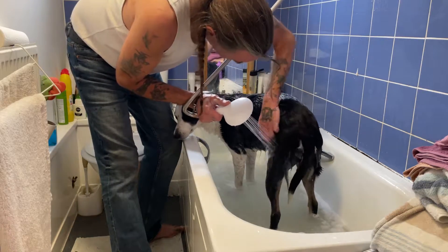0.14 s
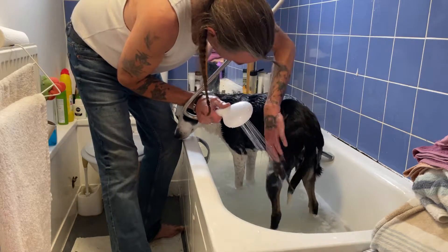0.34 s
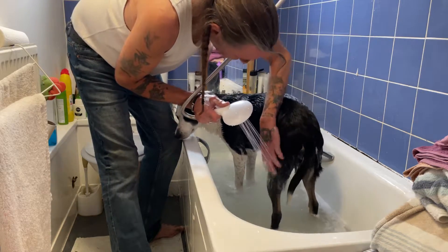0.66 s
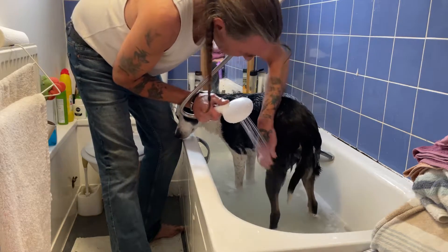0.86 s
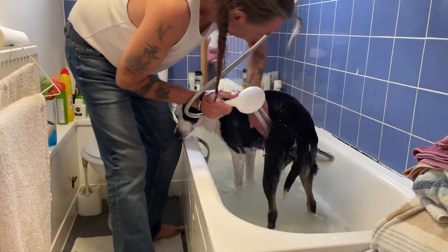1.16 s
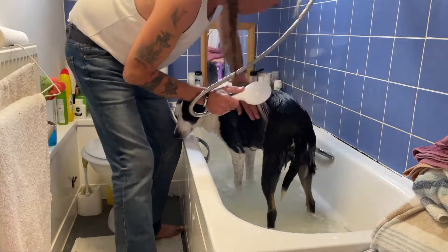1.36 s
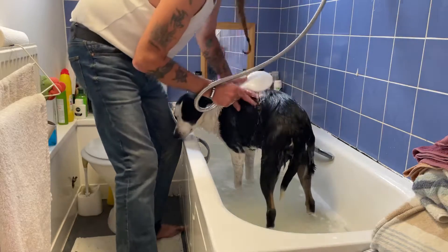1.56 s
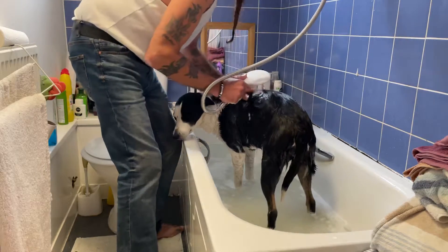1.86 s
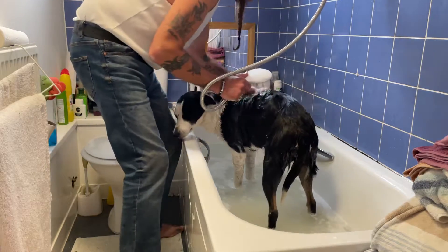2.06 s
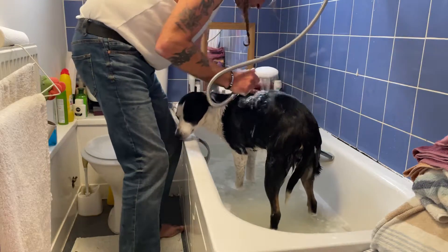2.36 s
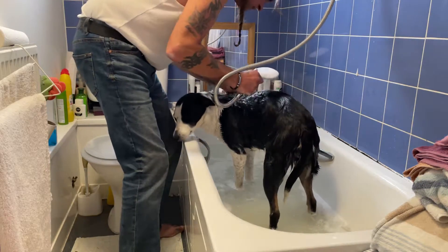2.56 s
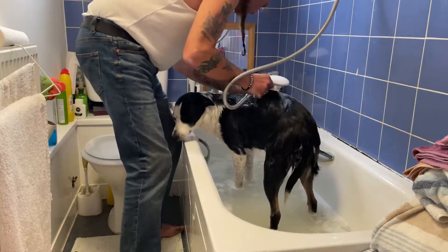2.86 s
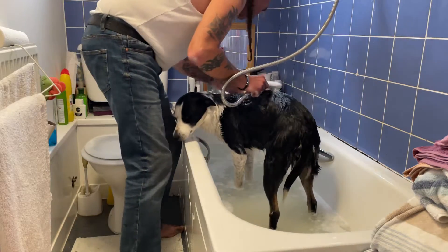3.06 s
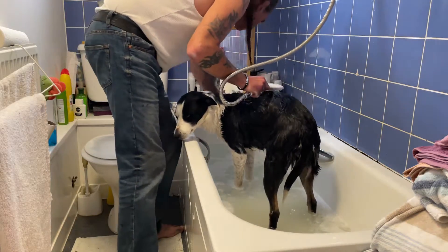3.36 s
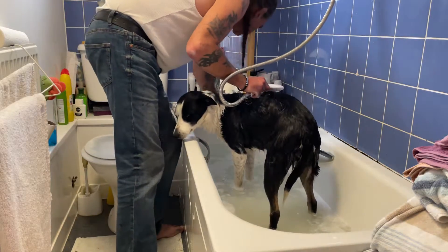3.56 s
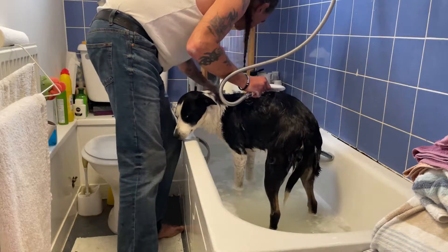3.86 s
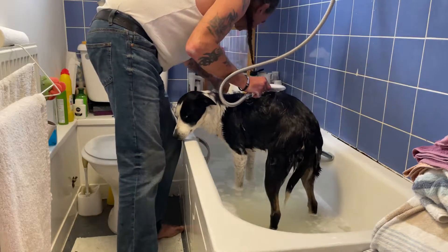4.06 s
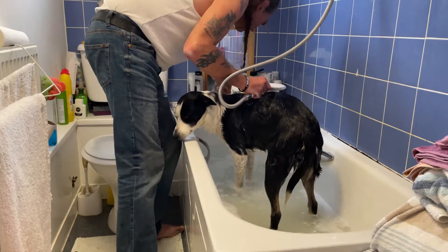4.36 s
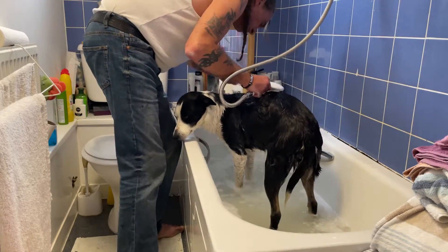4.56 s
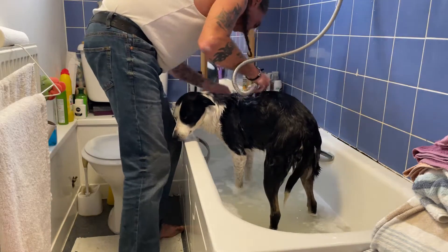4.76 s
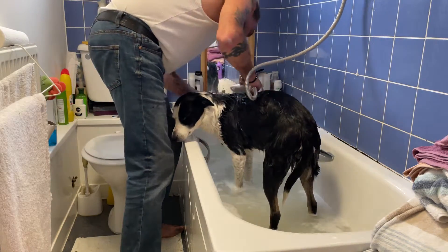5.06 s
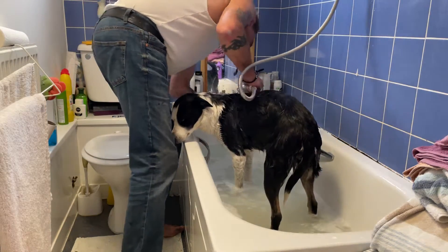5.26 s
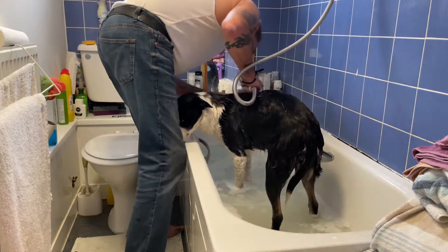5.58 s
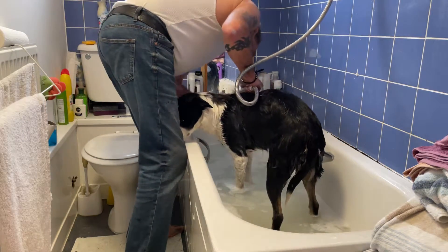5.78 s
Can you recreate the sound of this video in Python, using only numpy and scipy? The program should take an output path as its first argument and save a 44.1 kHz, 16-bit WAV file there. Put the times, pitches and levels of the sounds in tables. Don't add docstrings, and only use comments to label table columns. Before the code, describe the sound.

A hand shower runs without pause over a dog in a bathtub, in a small tiled bathroom with a short, bright tail. Airy jet hiss lies over dense patter on wet coat and shallow water, while trapped air near the shower head gurgles in brief changing pitches and fine froth fizzes. A dull tub knock comes at about 0.5 s, and spits of spray around 1 s. From 1.6 to 2.5 s the patter strengthens with light slaps and another spit. Around 3.1 to 3.3 s quick strokes make the patter jump against a quieter background. The busiest moment runs from 3.75 to 4.1 s: a sharp spit, low hollow thumps, slaps and gulps. Splashy run-off and rounded glugs continue to about 4.9 s, with the spray slightly duller. It then eases, with small gulps and a soft thump near 5.4 s and a last slap around 5.7 s.

```python
import sys
import numpy as np
from scipy import signal
from scipy.fft import rfft, irfft
from scipy.io import wavfile

SR = 44100
rng = np.random.default_rng(int(sys.argv[2]) if len(sys.argv) > 2 else 0)


def invert_db(level):
    return 10 ** (np.asarray(level, dtype=float) / 20)


def log_audio(samples):
    frames = np.atleast_2d(samples).T
    limited = np.clip(frames, -1, 1)
    pcm = np.round(limited * 32767).astype(np.int16)
    wavfile.write(sys.argv[1], SR, pcm)


N = 261072


def in_time(rows):
    seconds, values = np.transpose(rows)
    return np.interp(np.arange(N) / SR, seconds, values)


def at_hz(points, hz, column=1):
    points = np.array(points)
    return np.interp(np.log(hz), np.log(points[:, 0]), points[:, column])


def rms_one(x):
    return x / np.sqrt(np.mean(x ** 2) + 1e-20)


def drift(rate):
    r = np.exp(-80 * np.pi * rate / SR)
    slow = signal.lfilter([1], [1, -2 * r, r * r], rng.standard_normal(N // 40 + 2002))[2000:]
    return np.interp(np.arange(N) / 40, np.arange(len(slow)), rms_one(slow - slow.mean()))


def band_pass(x, low_hz, high_hz):
    return signal.sosfilt(signal.butter(2, [low_hz, high_hz], "band", fs=SR, output="sos"), x)


def resonance(x, hz, width_hz):
    r = np.exp(-np.pi * width_hz / SR)
    return signal.lfilter(np.array([1, 0, -1]) * (1 - r * r) / 2,
                          [1, -2 * r * np.cos(2 * np.pi * hz / SR), r * r], x)


def drops(per_s, spread_db):
    sizes = invert_db(spread_db * np.minimum(rng.exponential(1, N), 5))
    falls = rng.random(N) < per_s / SR
    return rms_one(sizes * falls * rng.choice([-1., 1.], (2, N)) + 1e-9)


def banded(sources, spectrum, patchy_db, rate):
    out, together = 0, drift(rate)
    edges = np.geomspace(spectrum[0][0], spectrum[-1][0], 11)
    for k, (low, high) in enumerate(zip(edges, edges[1:])):
        flicker_db = patchy_db * (.6 * together + drift(rate))
        level_db = at_hz(spectrum, np.sqrt(low * high)) + flicker_db
        out = out + invert_db(level_db) * band_pass(sources[k % 2], low, high)
    return rms_one(out)


def bursts(rows, q, rise_s, struck, split=0):
    out, t = np.zeros((2, N)), np.arange(SR // 4) / SR
    for s, peak_db, hz, t60 in rows:
        shape = (1 - np.exp(-t / rise_s)) * invert_db(-60 * t / max(t60, .02))
        fed = resonance(rng.standard_normal((2, len(t))), hz * (1 - split), hz / q)
        if split:
            fed = resonance(fed, hz * (1 + split), hz / q)
        ring = np.sqrt(2) * np.sin(2 * np.pi * hz * t)
        sound = shape * (struck * ring + (1 - struck) * rms_one(fed))
        even = np.sqrt(np.sum(shape ** 2) / np.mean(np.sum(sound ** 2, axis=1)))
        i = int(s * SR)
        out[:, i:i + len(t)] += invert_db(peak_db - 5.0) * even * sound[:, :N - i]
    return out


def swells(rows):
    t, edge_s = np.arange(N) / SR, 0.013
    start, length = np.transpose(rows)[:2, :, None]
    return np.clip(np.minimum(t - start, start + length - t) / edge_s + .5, 0, 1)


def hidden():
    from_s, fade_s = 3.9, .3
    return np.clip((np.arange(N) / SR - from_s) / fade_s, 0, 1)


# time in seconds, jet hiss in dB.
JET_HISS = [(0, -44.5), (.3, -48), (.45, -45.5), (.82, -52.5), (1.0, -48), (1.32, -49.5), (1.6, -49.5),
            (1.9, -48.5), (2.35, -46.5), (2.75, -49), (3.0, -51), (3.5, -51.5), (4.3, -50.5), (4.75, -51),
            (4.97, -56), (5.15, -51), (5.42, -49.5), (5.92, -52)]
# frequency in Hz, level in dB per Hz.
HISS_COLOUR = [(3000, -7), (4500, -2), (6000, -0.5), (8500, 0.5), (11000, -0.5), (13000, 0), (14500, -6.5),
               (15800, 0)]
# start in seconds, peak in dB, decay by 60 dB in seconds.
JET_SPITS = [
    (0.383, -46, 0.08),
    (0.9804, -29, 0.08),
    (1.121, -31, 0.08),
    (1.722, -27, 0.13),
    (1.7848, -31, 0.074),
    (2.3291, -25, 0.088),
    (3.759, -22, 0.055),
    (4.401, -21, 0.047),
    (4.52, -28, 0.16),
]


def jets():
    hiss = banded(rng.standard_normal((2, 2, N)), HISS_COLOUR, patchy_db=1.2, rate=13.0)
    spits = [(s, db - 1.0, 10000, t60) for s, db, t60 in JET_SPITS]
    return invert_db(in_time(JET_HISS) + 4.0) * hiss + bursts(spits, q=0.71, rise_s=0.0034, struck=0)


# time in seconds, patter in dB.
JET_STRIKE = [(0, -42), (.55, -44.5), (.75, -44), (.9, -50), (1.4, -48), (1.58, -41), (2.05, -45),
              (2.42, -47), (2.55, -43.5), (2.9, -43.5), (3.3, -53), (3.48, -50), (3.7, -44), (4.55, -43.5),
              (4.75, -42.5), (5.0, -46.5), (5.3, -46.5), (5.92, -46.5)]
# start in seconds, length in seconds, rise of the patter in dB.
HAND_STROKES = [(0.2, 0.12, 1.5), (1.02, 0.094, 4), (1.133, 0.12, 3.5), (1.742, 0.22, 1.5),
                (2.664, 0.25, -1), (5.392, 0.078, 1.5), (2.133, 0.2, 4), (2.933, 0.081, -0.5),
                (3.07, 0.098, 8.5), (3.21, 0.076, 8), (3.533, 0.053, 5), (3.76, 0.024, 8.5),
                (3.985, 0.059, 3.5), (4.185, 0.085, 5.5), (4.62, 0.12, 1.5), (5.666, 0.11, 2.5)]


def strike_levels():
    strike_db = in_time(JET_STRIKE)
    return strike_db, strike_db + np.array(HAND_STROKES)[:, 2] @ swells(HAND_STROKES)


# frequency in Hz, level in dB per Hz.
PATTER_COLOUR = [(300, 4.5), (500, -11.5), (1000, -2), (2000, 4), (3500, 5), (5500, 0.5), (7000, -2),
                 (12000, -6)]


def patter(patter_db):
    hits = [drops(9000, spread_db=3.5), drops(9000, spread_db=5.5)]
    open_air = banded(hits, PATTER_COLOUR, patchy_db=1.3, rate=10.5)
    top = open_air - signal.sosfilt(signal.butter(1, 4180, fs=SR, output="sos"), open_air)
    return invert_db(patter_db + 0.5) * (open_air - 0.32 * hidden() * top)


def bubbles(level_db, centre_hz, low_hz, high_hz, cycles):
    hits, out = drops(2500, spread_db=2.5), 0
    dealt = rng.integers(0, 10, N)
    for k, hz in enumerate(np.geomspace(low_hz, high_hz, 10)):
        near = np.exp(-(np.log2(hz / centre_hz) / 0.84) ** 2)
        out = out + near * rms_one(resonance(hits * (dealt == k) + 1e-12, hz, hz / cycles))
    return invert_db(level_db - 8.0) * rms_one(out)


# start in seconds, length in seconds, level in dB,
# pitch in Hz.
AIR_CUPPINGS = [(0.023, 0.11, -32.5, 1730), (0.255, 0.18, -38.5, 1770), (0.467, 0.19, -37, 1640),
                (0.724, 0.041, -36, 1590), (0.848, 0.083, -40, 1830), (.98, 0.098, -47, 1200),
                (1.473, 0.061, -53, 1450), (1.84, 0.095, -34.5, 1760), (1.96, 0.18, -36.5, 1400),
                (2.175, 0.28, -36.5, 1570), (2.522, 0.33, -35, 1470), (2.933, 0.08, -38, 1500),
                (3.107, 0.081, -36.5, 1400), (3.242, 0.12, -38, 1950), (3.368, 0.27, -43.5, 1480),
                (3.6, 0.05, -38, 1500), (3.664, 0.039, -41, 1180), (3.755, 0.048, -29.5, 1400),
                (3.933, 0.21, -38.5, 1450), (4.288, 0.075, -37, 1250), (4.396, 0.042, -47, 1350),
                (4.61, 0.067, -36.5, 1600), (4.843, 0.19, -38, 1900), (4.99, .17, -38.5, 1450),
                (5.154, 0.11, -38, 1250), (5.266, 0.21, -37, 1050), (5.45, 0.23, -40, 1280),
                (5.818, 0.098, -39, 1330)]


def air_pocket(strike_db):
    levels_db, pitches_hz = np.transpose(AIR_CUPPINGS)[2:]
    power = invert_db(levels_db[:, None]) ** 2 * swells(AIR_CUPPINGS) ** 2
    uncupped, uncupped_hz = invert_db(strike_db + 2) ** 2, 1500
    total = power.sum(axis=0) + uncupped
    pocket_hz = (pitches_hz @ power + uncupped_hz * uncupped) / total
    return bubbles(10 * np.log10(total), pocket_hz, low_hz=846, high_hz=2515, cycles=9.9)


def froth(strike_db, patter_db):
    level_db = strike_db + 0.74 * (patter_db - strike_db) - 0.5
    pitch_hz = 3100 * 2 ** (0.041 * drift(2.9))
    return bubbles(level_db, pitch_hz, low_hz=2100, high_hz=4530, cycles=19.0)


# time in seconds, ring in dB.
SHELL_RUNOFF = [(0, -51), (.45, -48.5), (1.2, -51), (3.0, -49.5), (3.65, -48.5), (3.9, -40.5),
                (4.08, -41.5), (4.17, -43), (4.55, -44.5), (4.9, -48), (5.3, -46.5), (5.92, -48.5)]
# frequency in Hz, width in Hz, level in dB.
BOOM_MODES = [(62.3, 20, 3.5), (116.4, 14, -0.5), (160, 46, 4.5), (195, 4.7, -1)]
# frequency in Hz, width in Hz, level in dB.
RING_MODES = [(315.6, 65, -1.5), (397, 28.3, -0.5), (566, 150, -1), (638, 95, -1.5), (730, 69, -1.5),
              (930, 15.4, -4), (1180, 135, -2), (1390, 67, -3), (1546, 115, -4.5)]
# start in seconds, peak in dB, struck mode in Hz,
# decay by 60 dB in seconds.
PAW_THUMPS = [(.53, -26.5, 486, 0.084), (.74, -38, 506, 0.28), (1.29, -32, 577, 0.1),
              (1.74, -38, 195, 0.28), (3.525, -32, 403, 0.25), (3.54, -33, 175, 0.19),
              (3.764, -19.5, 132, 0.14), (3.764, -30, 94, 0.25), (3.8, -51, 113, 0.2),
              (3.875, -34, 105, 0.18), (3.8, -34, 310, 0.33), (3.77, -41, 60, 0.58),
              (3.78, -37, 189.4, 0.6), (3.85, -22.5, 140, 0.14), (3.993, -20.5, 385, 0.14),
              (4.0, -31, 156, 0.21), (4.05, -20, 386, 0.11), (4.33, -25, 160, 0.15), (5.37, -33, 151, 0.14),
              (5.375, -34, 62.5, 0.31), (5.45, -40, 60, 0.22), (5.485, -39.5, 160, 0.15)]


def shell_mode(hits, hz, width_hz, db):
    width_hz = 1.31 * width_hz
    rung = resonance(resonance(hits, hz, width_hz), hz, width_hz)
    return invert_db(db + 1.4 * drift(3.9)) * rms_one(rung)


def tub():
    ring_db = in_time(SHELL_RUNOFF)
    boom_db = -52 + 0.78 * (ring_db - ring_db.mean())
    hits = drops(3000, spread_db=3.0)
    out = invert_db(boom_db - 6) * rms_one(band_pass(rng.standard_normal((2, N)), 24, 110))
    for modes, level_db in (BOOM_MODES, boom_db), (RING_MODES, ring_db):
        out = out + invert_db(level_db + 0.5) * rms_one(sum(shell_mode(hits, *mode) for mode in modes))
    return out + bursts(PAW_THUMPS, q=8.6, rise_s=0.012, struck=0.49)


# start in seconds, length in seconds,
# first pitch in Hz, last pitch in Hz, level in dB.
SHEET_HUMS = [(0.996, 0.041, 1090, 1090, -47), (0.211, 0.077, 2640, 2490, -44),
              (0.33, 0.12, 498, 505, -51.5), (0.415, 0.052, 3100, 2850, -45), (0.53, 0.04, 2446, 2400, -46),
              (1.104, 0.047, 1310, 1330, -46), (1.485, 0.12, 1845, 1910, -48.5),
              (1.579, 0.24, 1890, 1907, -50.5), (1.848, 0.15, 1900, 2124, -44.5),
              (1.88, 0.17, 1500, 1500, -47), (1.56, 0.048, 1500, 1260, -45), (1.689, 0.07, 930, 930, -49),
              (1.991, 0.13, 1300, 1157, -46.5), (2.02, 0.064, 1500, 1745, -45),
              (2.19, 0.065, 2920, 2900, -42), (2.23, 0.054, 2640, 2600, -44),
              (2.226, 0.078, 1500, 1310, -44), (2.252, 0.065, 930, 930, -47),
              (2.601, 0.11, 1185, 1153, -40), (2.562, 0.12, 1400, 1400, -41),
              (2.708, 0.12, 1390, 1390, -38.5), (2.97, 0.078, 726, 705, -50), (3.25, 0.28, 748, 769, -53.5),
              (3.541, 0.18, 750, 723, -54.5), (4.074, 0.076, 413, 396, -42), (4.282, 0.034, 590, 785, -35),
              (4.386, 0.054, 602, 590, -46), (4.484, 0.053, 770, 764, -41), (4.532, 0.059, 763, 698, -37),
              (4.824, 0.057, 1596, 1550, -50), (4.92, 0.087, 2140, 1756, -55),
              (4.958, 0.2, 1590, 1250, -49), (5.201, 0.11, 569, 532, -49.5), (5.434, 0.074, 1005, 960, -53)]


def hums():
    out = np.zeros((2, N))
    for s, length, first_hz, last_hz, db in SHEET_HUMS:
        i, n = int(s * SR), int(length * SR)
        white = rng.standard_normal((2, 2, SR // 2 + SR // 8))
        r = np.exp(-np.pi * 0.026 * (first_hz + last_hz) / SR)
        slow = signal.lfilter([1], [1, -2 * r, r * r], white[0] + 1j * white[1])[:, -n:]
        steadied = slow / np.abs(slow) ** .6
        phase = 2 * np.pi * np.cumsum(np.geomspace(first_hz, last_hz, n)) / SR
        note = rms_one(np.real(steadied * np.exp(1j * phase)))
        out[:, i:i + n] += invert_db(db) * signal.windows.tukey(n, .5) * note
    return out


# start in seconds, peak in dB, colour in Hz,
# decay by 60 dB in seconds.
WATER_SLAPS = [(0.4599, -35, 2930, 0.1), (1.1732, -40, 2700, 0.1), (1.6636, -28.5, 2400, 0.086),
               (1.724, -31.5, 2100, 0.093), (1.7774, -36, 1940, 0.035), (1.58, -32.5, 3350, 0.16),
               (1.931, -34, 2140, 0.095), (2.0233, -32, 2050, 0.12), (2.165, -34, 2240, 0.17),
               (2.2079, -38, 2850, 0.1), (2.4758, -35.5, 3250, 0.31), (2.9432, -33, 3720, 0.16),
               (3.0719, -35, 3400, 0.08), (3.2505, -24.5, 3630, 0.084), (3.5478, -35, 2970, 0.16),
               (3.6107, -28.5, 2540, 0.05), (3.619, -28, 3300, 0.097), (3.76, -31, 2560, 0.077),
               (3.768, -26, 1800, 0.073), (3.8337, -35, 4060, 0.15), (3.9833, -22.5, 2600, 0.054),
               (4.0652, -29.5, 3620, 0.076), (4.1874, -35, 3430, 0.089), (4.232, -28, 2900, 0.12),
               (4.3141, -30, 2600, 0.13), (4.4692, -32, 3360, 0.051), (4.6224, -29.5, 2620, 0.1),
               (4.66, -28, 2400, 0.063), (4.7082, -27, 2780, 0.13), (4.7711, -29, 3180, 0.072),
               (4.8718, -32, 2820, 0.052), (5.6605, -36.5, 3700, 0.097), (5.7209, -30.5, 2190, 0.21)]


def slaps():
    return bursts(WATER_SLAPS, q=2.4, rise_s=0.00065, struck=0, split=0.1)


# start in seconds, peak in dB, pitch in Hz, decay by 60 dB in seconds.
AIR_GULPS = [(0.596, -34, 930, 0.18), (0.733, -36.5, 501, 0.18), (1.472, -36, 740, 0.13),
             (1.485, -35, 1105, 0.12), (2.56, -37.5, 1477, 0.38), (2.612, -42, 1210, 0.12),
             (2.777, -41, 1390, 0.26), (2.945, -38, 1570, 0.15), (3.216, -30.5, 746, 0.15),
             (3.505, -32, 775, 0.21), (3.723, -29.5, 666, 0.11), (3.765, -27, 955, 0.05),
             (3.867, -21, 750, 0.047), (3.942, -27.5, 1270, 0.062), (3.995, -33, 630, 0.15),
             (4.29, -30, 926, 0.22), (4.408, -29.5, 1290, 0.11), (4.534, -23.5, 638, 0.2),
             (4.578, -28, 582, 0.11), (4.626, -35, 1172, 0.16), (4.99, -40, 746, 0.092),
             (5.075, -37, 520, 0.058), (5.1, -41, 730, 0.1), (5.155, -31, 810, 0.074),
             (5.31, -31, 1170, 0.1), (5.33, -29, 950, 0.1), (5.735, -31.5, 781, 0.15),
             (5.47, -35, 856, 0.16)]


def gulps():
    return bursts(AIR_GULPS, q=5.3, rise_s=0.0026, struck=.5)


def bathroom(x):
    hop, t60_s = int(.09 * SR), 0.13
    t = np.arange(hop) / SR
    out, source = np.zeros((2, N + 5 * hop)), np.pad(x[0], (hop, 2 * hop))
    fade = np.sqrt(np.hanning(2 * hop))
    for i in range(0, N + hop, hop):
        tail = rng.standard_normal((2, hop)) * invert_db(-60 * t / t60_s) * (t > .003)
        tail = tail / np.sqrt(np.sum(tail ** 2) / 2)
        piece = source[i:i + 2 * hop] * fade
        out[:, i:i + 3 * hop - 1] += signal.fftconvolve(piece[None], tail, axes=1)
    return out[:, hop:hop + N]


def scene():
    strike_db, patter_db = strike_levels()
    spray = jets() + patter(patter_db) + air_pocket(strike_db) + froth(strike_db, patter_db)
    splashes = hums() + slaps() + gulps()
    return splashes + spray + invert_db(-3) * bathroom(spray + 0.62 * splashes) + tub()


def low_pass(x):
    return signal.sosfilt(signal.butter(12, 15750, fs=SR, output="sos"), x)


# frequency in Hz, left-right likeness 0-1, left minus right in
# dB.
MICROPHONE_PAIR = [(60, 0.96, 1), (165, 0.62, 8), (294, 0.67, 4.5), (670, 0.016, 6.5), (1400, 0.051, 3),
                   (2300, 0.27, 2), (3900, 0.17, 4.5), (5800, 0.13, 5.5), (6160, 0.032, 2.5),
                   (6900, .5, 2.8), (7900, .85, .5), (9200, .62, 1.5), (10500, .95, 0), (11700, .955, 0),
             (12600, .7, 0), (13400, .8, 0), (14300, .93, 0), (15700, .84, 0)]
# frequency in Hz, lead of the right port in cycles.
RIGHT_LEAD = [(6200, 0), (6550, .07), (7250, .44), (7900, .5), (8300, .55), (10000, .94), (10500, 1),
              (11800, 1), (12750, 1.25), (13300, 1.42), (14000, 1.5)]


def record(dry):
    first, second = rfft(dry)
    hz = np.maximum(np.arange(len(first)) * SR / N, 1)
    pair = MICROPHONE_PAIR
    alike = np.clip(at_hz(pair, hz), 0, 1)
    lean = invert_db(at_hz(pair, hz, column=2) / 2)
    ahead = np.exp(2j * np.pi * at_hz(RIGHT_LEAD, hz))
    right = (alike * ahead * first + np.sqrt(1 - alike ** 2) * second) / lean
    above = hz > RIGHT_LEAD[0][0]
    left, right, treble, diffuse = irfft([first * lean, right, right * above, 1j * second * above], N)
    share = .38 * hidden()
    right = right + (np.sqrt(1 - share ** 2) - 1) * treble + share * diffuse
    return low_pass(np.array([left, right]))


dry = scene()
out = record(dry)
log_audio(out)
```